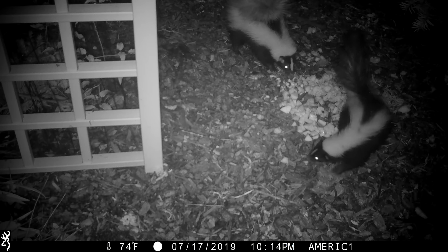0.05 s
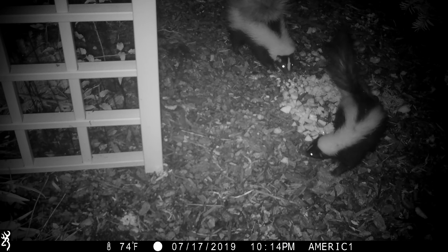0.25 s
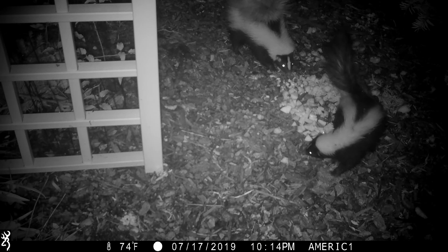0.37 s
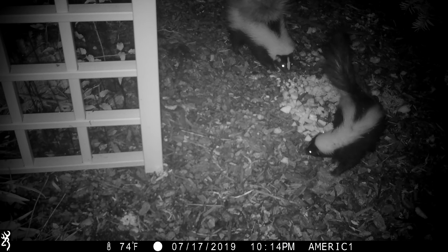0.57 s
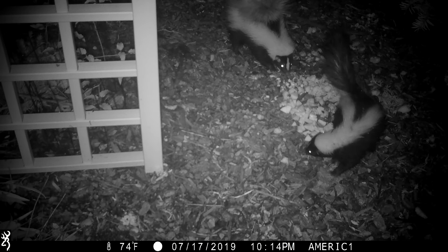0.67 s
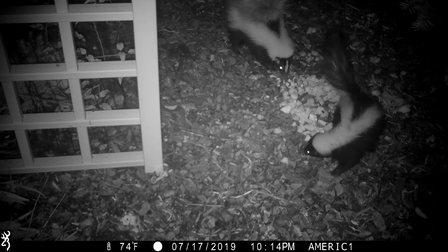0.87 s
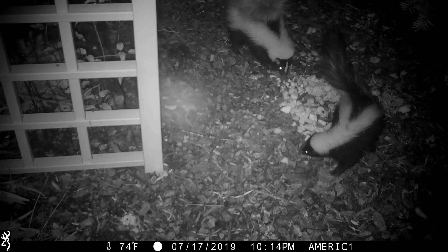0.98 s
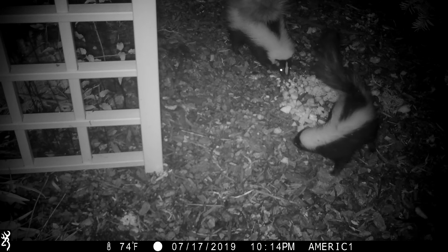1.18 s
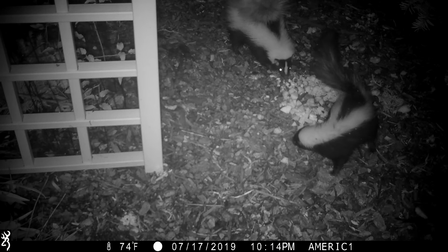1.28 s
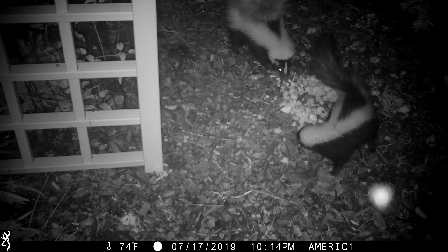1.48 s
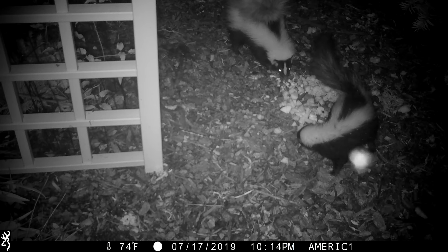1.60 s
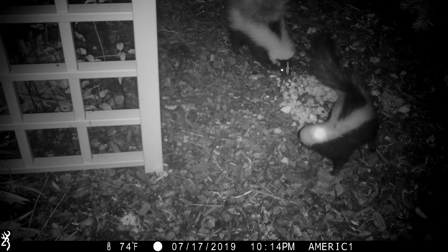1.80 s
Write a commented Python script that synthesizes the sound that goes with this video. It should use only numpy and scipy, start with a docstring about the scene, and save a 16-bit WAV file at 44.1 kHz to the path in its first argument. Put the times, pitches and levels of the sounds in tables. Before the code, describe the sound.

A skunk whines raspily and lets out one shrill squeal over faint night hiss.

```python
"""Skunks squabbling at night

Two skunks on leaf litter in a yard, close to a trail camera with a narrow-band microphone.
One whines on a low buzzing note whose pulses ring a shrill, fluttering resonance; this breaks into
a loud whistling squeal that sags and ends in a grunt. After a pause with a few faint grunts the
raspy whine starts again. A steady rumble and hiss lie underneath."""
import sys
import numpy as np
from scipy import signal
from scipy.fft import rfft, irfft, next_fast_len
from scipy.io import wavfile
from scipy.ndimage import map_coordinates

SR = 44100
rng = np.random.default_rng(int(sys.argv[2]) if len(sys.argv) > 2 else 0)


def inscribe(sig):
    """Save sig as 16-bit PCM at rate SR to the path in sys.argv[1].

    A 1-D sig is mono; a 2-D sig holds one channel per row.
    Samples are clipped to [-1, 1] before scaling.
    """
    pcm = np.round(np.clip(np.atleast_2d(sig).T, -1, 1) * 32767)
    wavfile.write(sys.argv[1], SR, pcm.astype(np.int16))


N = 81585


def amp(db):
    """Decibels to gain."""
    return 10 ** (np.asarray(db) / 20)


def unit(x):
    """Scale to rms 1."""
    return x / np.sqrt(np.mean(x ** 2) + 1e-20)


def clock():
    """Seconds at each sample."""
    return np.arange(N) / SR


def curves(rows):
    """One value per sample for each column after the time."""
    times, *columns = np.transpose(rows)
    return [np.interp(clock(), times, column) for column in columns]


def wobble(rate):
    """A smooth random curve, rate knots a second."""
    return map_coordinates(rng.standard_normal(N // 8), [clock() * rate + 2], mode="wrap")


def turning(hz):
    """Phase of an oscillator in radians."""
    return 2 * np.pi * np.cumsum(hz) / SR


def filtered(x, response):
    """Filter x by a gain given as a function of frequency."""
    size = next_fast_len(N + 8192)
    return irfft(rfft(x, size) * response(np.fft.rfftfreq(size, 1 / SR)), size)[:N]


def coloured(x, spectrum):
    """x shaped by (Hz, dB) points, at rms 1."""
    freq_hz, db = np.transpose(spectrum)
    return unit(filtered(x, lambda hz: amp(np.interp(np.log(hz + 1), np.log(freq_hz + 1), db))))


def whine(phase):
    """The low buzzing note, with air that escapes once a cycle."""
    # loudness of the note: time_s, level_db
    loudness = [(0, -42), (.1, -43), (.21, -43), (.3, -47), (.385, -45), (.403, -33), (.43, -64.5),
                (.45, -105), (1.012, -92), (1.026, -40.5), (1.07, -42.5), (1.2, -39), (1.58, -40),
                (1.66, -42.5), (1.85, -40.5)]
    # harmonics from the fundamental up: relative_db
    harmonics = [0, -5.5, -9.5, -7.5, -9.5, -36, -17]
    # spectrum of the escaping air: freq_hz, relative_db
    air_spectrum = [(300, -7), (800, -4), (1200, -10), (1600, -4.5), (2100, -2.5), (2700, -3.5),
                    (3000, -1.5), (4200, -20.5), (4600, -13)]
    level_db, = curves(loudness)
    note = np.zeros(N)
    for number, db in enumerate(harmonics, start=1):
        gain = amp(db + 0.68 * wobble(25))
        note += gain * np.sin(number * phase + rng.uniform(0, 2 * np.pi))
    puffs = rng.standard_normal(N) * (1 + 1.7 * np.cos(phase))
    air = amp(4) * coloured(puffs, air_spectrum)
    return amp(level_db) * (unit(note) + air)


def rasp(phase):
    """Each cycle of the low voice rings the shrill throat resonance, in fluttering bunches."""
    # throat resonance: freq_hz, relative_db
    throat = [(2000, -63), (2900, -36.5), (3080, -4.5), (3380, -3), (3550, 5), (3720, -1.5), (3950, -7),
              (4200, -13.5), (4500, -23.5)]
    # loudness of the rasp: time_s, level_db
    loudness = [(0, -37), (.025, -29), (.068, -28.5), (.11, -28), (.135, -26.5), (.18, -23), (.225, -19),
                (.28, -29.5), (.35, -22), (.39, -29.5), (.41, -94), (1.0, -101.5), (1.05, -43.5),
                (1.155, -35.5), (1.205, -30), (1.235, -34.5), (1.32, -38), (1.385, -27.5), (1.425, -36),
                (1.495, -23.5), (1.535, -39), (1.578, -24.5), (1.605, -24.5), (1.64, -31.5), (1.71, -33.5),
                (1.81, -36), (1.85, -31)]
    # sharp catches in the voice: centre_s, peak_db
    catches = [(0.071, -15.5), (.1475, -13.5), (.161, -15), (.1745, -11.5), (0.186, -6.5), (1.166, -16.5),
               (1.189, -14), (1.25, -17.5), (1.267, -27), (1.288, -18.5), (1.3, -16.5), (1.337, -17),
               (1.352, -17.5), (1.398, -24), (1.4353, -13), (1.459, -16), (1.472, -15.5), (1.492, -12),
               (1.523, -20), (1.548, -17), (1.561, -14.5), (1.586, -16), (1.613, -17), (1.625, -14),
               (1.663, -17.5), (1.703, -21), (1.731, -12.5), (1.744, -17.5), (1.82, -19), (1.833, -15)]
    jitter_s, scatter_db = .00007, 3.84
    flutter_hz, flutter_wander, flutter_depth = 77.96, .22, .27
    catch_sigma_s, crest_db = .0024, 6.5  # a catch's rms lies crest_db under its peak
    cycle_starts = np.flatnonzero(np.diff(phase // (2 * np.pi)))
    timing, strength = rng.standard_normal((1024, 2))[:len(cycle_starts)].T
    onsets = np.round(cycle_starts + jitter_s * SR * timing).astype(int)
    pulses = np.bincount(np.clip(onsets, 0, N - 1), amp(scatter_db * strength), N)
    ring = coloured(pulses, throat)
    flutter_phase = turning(flutter_hz * (1 + flutter_wander * wobble(70)))
    flutter = unit(1 + flutter_depth * np.sin(flutter_phase))
    level_db, = curves(loudness)
    spikes = sum(amp(peak_db - crest_db) * np.exp(-.5 * ((clock() - centre_s) / catch_sigma_s) ** 2)
                 for centre_s, peak_db in catches)
    return ring * np.maximum(amp(level_db) * flutter, spikes)


def night():
    """Steady low rumble and faint hiss."""
    # spectrum of the night ambience: freq_hz, relative_db
    spectrum = [(15, -39), (25, -8.5), (59, -0.5), (96, -5), (183, -4), (263, -15), (319, -8), (356, -15.5),
                (422, -7), (546, -8.5), (752, -7.5), (952, -15.5), (1770, -22.5), (2290, -12), (2840, -20),
                (3370, -11), (4170, -29), (5420, -54.5), (9170, -120)]
    return amp(-39) * coloured(rng.standard_normal(N), spectrum)


def yard_scatter(voice):
    """Short reflections from the ground and a trellis."""
    t60_s, gap_s = .09, .003
    t = np.arange(SR // 4) / SR
    tail = rng.standard_normal(len(t)) * amp(-60 * t / t60_s) * (t > gap_s)
    return signal.fftconvolve(voice, tail / np.linalg.norm(tail))[:N]


def squeal(low_hz):
    """A second oscillator in the throat whistles; each unsteady low cycle dips its level and pitch."""
    # the whistle between dips, ahead of the throat's filter: time_s, pitch_hz, level_db
    contour = [(.205, 3710, -34.5), (.212, 3599, -15), (.22, 3564, -8.5), (.226, 3434, -4),
               (.231, 3402, -13.5), (.24, 3305, -6.5), (.252, 3368, -2), (.263, 3363, -2.5),
               (.271, 3277, -3.5), (.302, 3310, -4), (.308, 3284, -7.5), (.318, 3299, -4.5),
               (.327, 3314, -5), (.336, 3258, -8), (.358, 3271, -5), (.37, 3174, -8), (.377, 3070, -11.5),
               (.387, 2996, -12.5), (.394, 2588, -13), (.4, 1914, -26)]
    # how deeply the low voice chokes the whistle: time_s, depth_fraction
    choking = [(.21, 0.59), (.24, 0.34), (.267, 0.74), (.277, 0.07), (.298, 0.6), (.308, 0.3), (.322, 0.5),
               (.338, .6), (.365, .6), (.39, 0.76)]
    choke_sag_hz, throat_edge_hz = 259, 2565
    pitch_hz, level_db = curves(contour)
    depth = np.clip(curves(choking)[0] * (1 + .25 * wobble(300)), 0, 1)
    low_phase = turning(low_hz * (1 + .16 * wobble(250)))
    choke = np.sin(low_phase / 2) ** 4
    sag_hz = choke_sag_hz * depth * (choke - choke.mean())
    phase = turning(pitch_hz * (1 + .01 * wobble(600)) - sag_hz)
    sounding = (clock() > contour[0][0]) & (clock() < contour[-1][0])
    whistle = np.sqrt(2) * amp(level_db) * sounding * (1 - depth * choke) * np.sin(phase)
    # the throat passes little of the whistle below its edge
    return filtered(whistle, lambda hz: .15 + .85 / (1 + (throat_edge_hz / (hz + 1)) ** 24))


def grunts():
    """Brief low notes, most of them gliding; the strongest and roughest closes the squeal."""
    # grunts: centre_s, pitch_hz, glide_octaves_per_s, sigma_s, level_db, roughness_fraction
    notes = [(.273, 460, 10, .008, -38, .06), (.402, 560, -24, .006, -31, .3),
             (.484, 640, 20, .009, -40, .06), (.632, 420, 0, .009, -41, .06),
             (.932, 700, 10, .010, -39, .15), (1.134, 590, 18, .009, -35, .04),
             (1.31, 530, 0, .008, -38, .04)]
    octave_db = -12.5
    out = np.zeros(N)
    for centre_s, pitch_hz, glide, sigma_s, level_db, roughness in notes:
        t = clock() - centre_s
        gliding_hz = pitch_hz * 2 ** (glide * np.clip(t, -.03, .03))
        phase = turning(gliding_hz * (1 + roughness * wobble(700)))
        tone = unit(np.sin(phase) + amp(octave_db) * np.sin(2 * phase))
        out += amp(level_db) * np.exp(-.5 * (t / sigma_s) ** 2) * tone
    return out


def scene():
    """One skunk's voice at close range, with weak reflections from the yard and the night behind it."""
    # pitch of the low voice: time_s, pitch_hz
    low_pitch = [(0, 388), (.1, 395), (.2, 385), (.3, 400), (.39, 370), (.42, 290), (1.02, 335),
                 (1.055, 378), (1.15, 404), (1.35, 417), (1.44, 412), (1.475, 434), (1.52, 412), (1.6, 420),
                 (1.63, 396), (1.7, 406), (1.85, 400)]
    low_hz, = curves(low_pitch)
    phase = turning(low_hz * (1 + .014 * wobble(120)))
    skunk = whine(phase) + rasp(phase) + squeal(low_hz) + grunts()
    return (skunk + amp(-24) * yard_scatter(skunk) + night())[None]


def record(dry):
    """The trail camera's mono microphone passes only a narrow band; the top of the squeal clips."""
    mic_cutoff_hz, mic_order, top_hz = 4400, 24, 17270
    narrow = filtered(dry[0], lambda hz: 1 / (1 + (hz / mic_cutoff_hz) ** (2 * mic_order)))
    clipped = np.clip(narrow, -1, 1)
    return filtered(clipped, lambda hz: hz < top_hz)[None]


dry = scene()
out = record(dry)
inscribe(out)
```